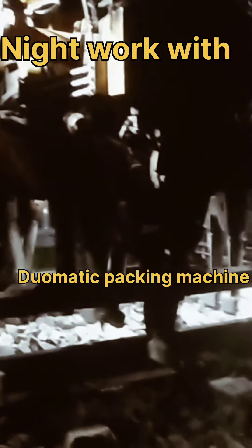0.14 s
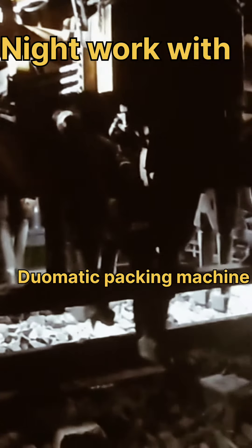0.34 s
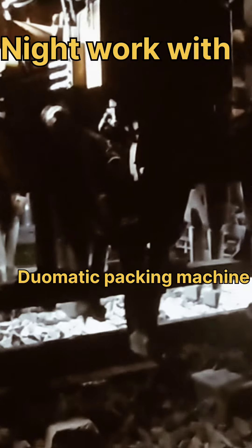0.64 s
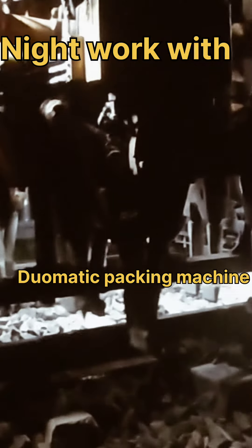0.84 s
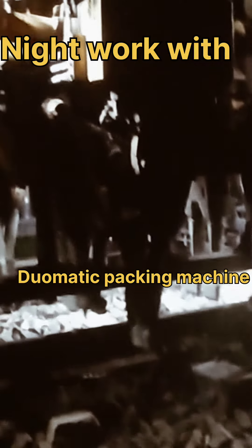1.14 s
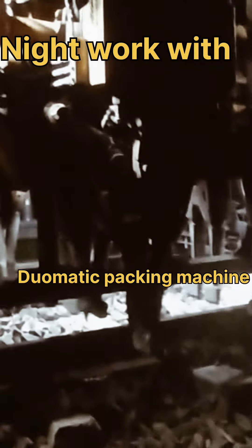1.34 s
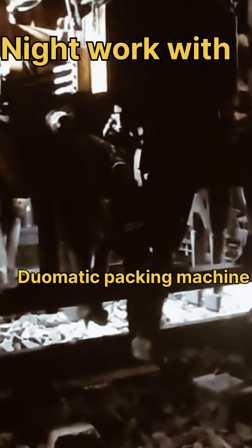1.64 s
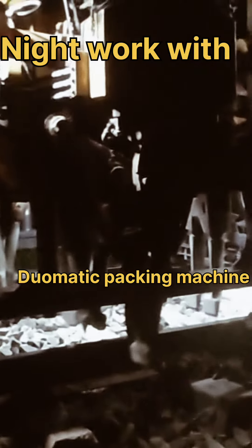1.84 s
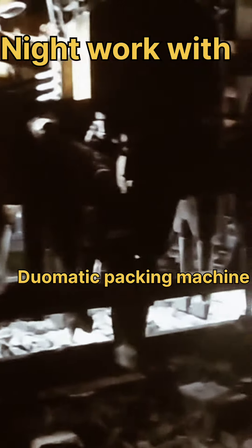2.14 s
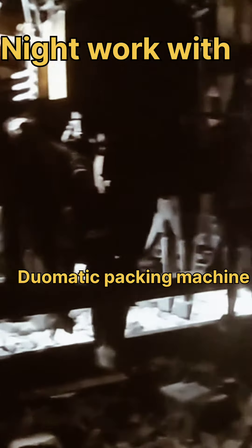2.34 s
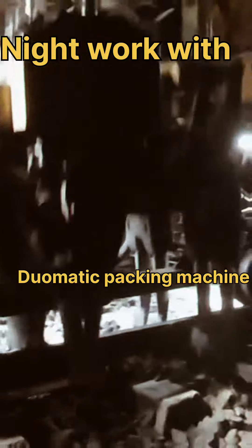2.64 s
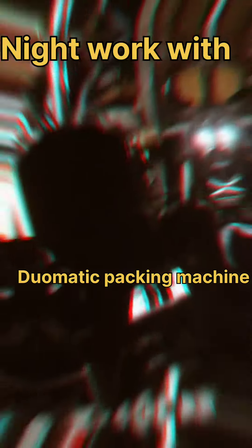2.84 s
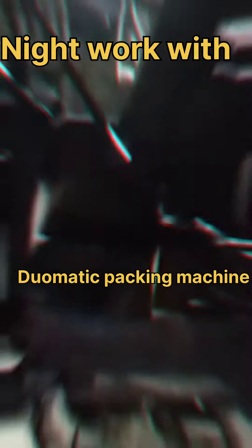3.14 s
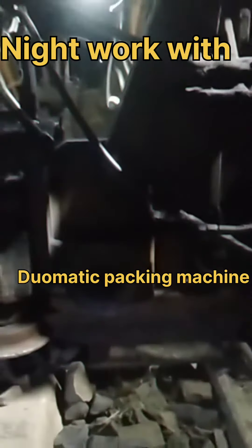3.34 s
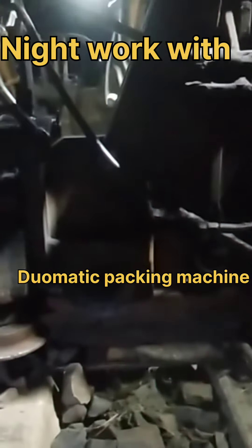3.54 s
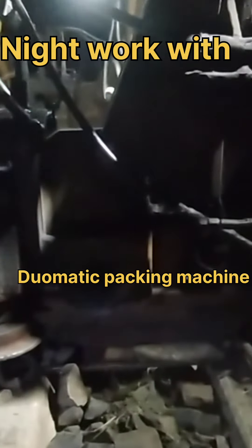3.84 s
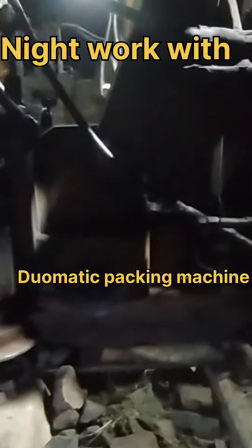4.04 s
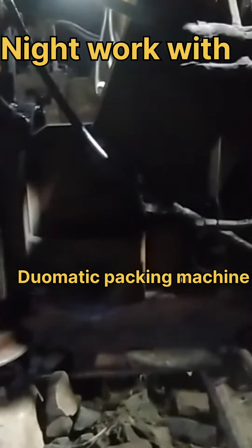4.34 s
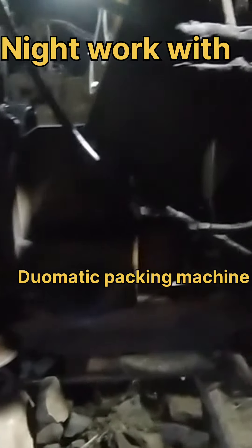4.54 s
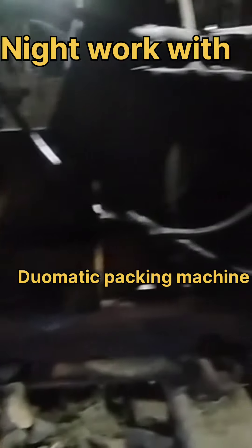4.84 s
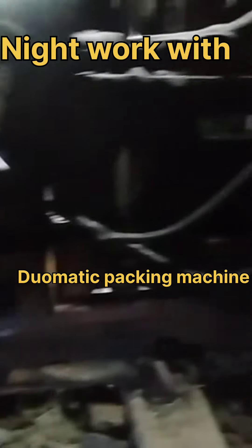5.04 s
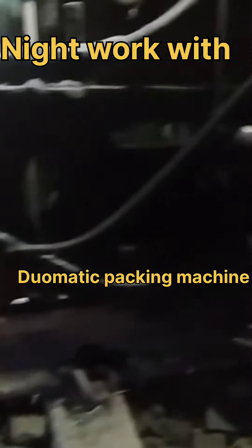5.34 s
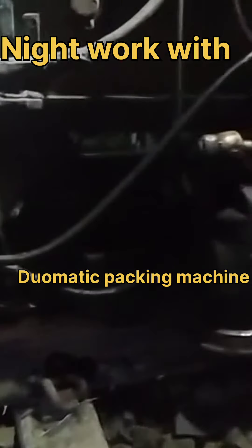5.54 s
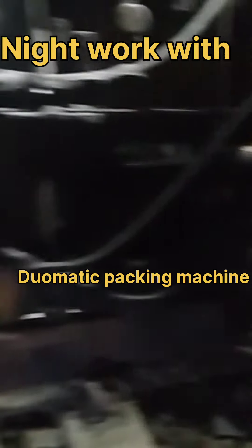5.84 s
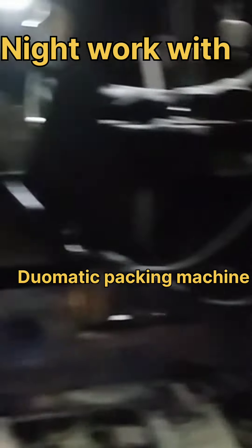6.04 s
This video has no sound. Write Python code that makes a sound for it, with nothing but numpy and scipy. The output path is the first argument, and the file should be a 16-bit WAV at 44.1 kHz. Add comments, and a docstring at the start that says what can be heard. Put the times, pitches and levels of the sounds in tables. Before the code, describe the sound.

Close beside a track maintenance machine outdoors at night, a dense, steady roar of steel and ballast mixes with diesel drone, pump whine and fast rattling. Near the end of this part come a puff, scraping clanks and a strong air hiss. A sudden short silence follows, then the abrupt start of a deep idling hum with clatter, knocks and squeaky chirps; load deepens the pitch slightly and a small pump winds up.

```python
"""A broad roar of steel and ballast, a diesel at speed and a pump whine: a track tamping machine at night.
Layers of noise make the roar, wavering sines the engine, pump and gears; ringing steel clanks, air bursts.
After a short silence we stand near the idling engine: a deep exhaust hum, knock, squeak and clatter.
Its pitch settles, then sags as a load comes on; the knock grows and a small pump winds up to a whine."""
import sys
import numpy as np
from scipy import signal
from scipy.fft import rfft, irfft, next_fast_len
from scipy.io import wavfile

SR = 44100
rng = np.random.default_rng(int(sys.argv[2]) if len(sys.argv) > 2 else 0)


def pcm_store(signal):
    """Save signal as 16-bit PCM."""
    levels = np.round(np.clip(np.atleast_2d(signal), -1, 1) * 32767)
    wavfile.write(sys.argv[1], SR, levels.astype(np.int16).T)


N = 272979  # length in samples
WORK_END_S, IDLE_START_S = 2.953, 3.297  # silence lies between the two spots
AIR_S, AIR_SWELL_S = 2.64, .2  # start and rise of the steady air
LABOUR_S, LABOUR_RISE_S = 0.83, 0.39  # the working engine begins to labour


def working_machine():
    """The first spot: engine, pump and gears reach the left side slightly late, amid roar, air and steel."""
    tones = working_diesel() + main_pump() + working_gears() + passing_tones()
    near = lagged(tones + shake(), lag_s=.00005)
    return near + roar() + escaping_air() + handling_bump() + clank()


# The roar's broad colour: (frequency [Hz], relative level per Hz [dB])
ROAR_COLOUR = [(15, -50), (25, -29), (53, -34.5), (70, -21.5), (96, -19.5), (136, -17.5), (240, -9),
               (274, -7), (359, -9.5), (1030, -10.5), (1800, -15.5), (3010, -13.5), (6560, -26),
               (9570, -29), (15500, -52)]
# Panels and ports that stand out: (frequency [Hz], width [Hz], boost [dB])
ROAR_PEAKS = [(593, 130, 5), (1050, 130, 5), (1495, 130, 2.5), (1810, 126, -3), (2485, 94, 2.5),
              (3000, 244, 4.5), (9400, 1600, 7), (10400, 260, 6.5)]
# Which side is louder: (frequency [Hz], left minus right [dB])
ROAR_BALANCE = [(60, 1), (92, -2.5), (140, -0.5), (210, 0.5), (330, 2), (500, -2), (770, -0.5), (1170, -3),
                (1790, -4.5), (2740, 8), (4190, 3.5), (6410, 1.5), (9810, -16), (15000, 1.5)]
# How alike the two sides are, also for the air: (frequency [Hz], likeness [0-1])
ROAR_LIKENESS = [(60, 1), (300, 0.85), (640, 0.8), (1000, .62), (1500, 0.35), (1900, .12), (2600, 0.32),
                 (4000, .14), (15000, 0.1)]
ROAR_DB, ROAR_THINS_DB = -15, 2  # level, and its loss as the air swells


def roar():
    """Countless small impacts of steel and ballast add up to wide, coloured noise."""
    swell = ramp(AIR_S, AIR_SWELL_S)
    level = amp(ROAR_DB - ROAR_THINS_DB * swell ** 2)
    return level * wide_noise(ROAR_COLOUR, ROAR_PEAKS, ROAR_BALANCE, ROAR_LIKENESS,
                              lag_s=.00009, patchy_db=1.03)


# Speed of the working diesel: (time [s], crank turns per second [Hz])
CRANK_SPEED = [(0, 35.75), (.45, 35.65), (1.15, 34.5), (1.65, 34.45), (2.2, 35.25), (2.95, 35.35)]
# Engine tones: (multiple of crank speed, level [dB])
WORK_ORDERS = [(2, -46), (3, -34), (5, -34.5), (12, -36)]
# The tone at six times crank speed: (time [s], level [dB])
SIXTH_LEVEL = [(0, -32.5), (.5, -27.5), (.9, -32.5), (1.2, -25.5), (1.7, -26), (2.0, -28), (2.4, -28),
               (2.95, -31.5)]


def working_diesel():
    """The turning crank and the firings give tones at multiples of the crank speed."""
    crank_hz, = in_time(CRANK_SPEED)
    lighter_db = before_labour_db()
    orders = sum(tone(k * crank_hz, db + lighter_db * (k > 3), waver_db=1.5, waver_rate=5)
                 for k, db in WORK_ORDERS)
    return orders + tone(6 * crank_hz, *in_time(SIXTH_LEVEL), waver_db=1.3, waver_rate=5)


# The main pump: (time [s], piston rate [Hz], level [dB])
PUMP = [(0, 279, -20), (.6, 278.3, -19), (1.1, 275.1, -22), (1.75, 269.2, -25), (2.1, 270.6, -24.5),
        (2.5, 273.7, -20.5), (2.78, 280, -28), (2.95, 284, -35.5)]


def main_pump():
    """Each piston stroke pushes the oil once, so the pump whines at its piston rate."""
    return tone(*in_time(PUMP), waver_db=1.0, waver_rate=5)


# Steady tones of a shaft and gears at fixed speed: (frequency [Hz], level after labour sets in [dB])
GEARS = [(29.9, -46), (46.3, -42), (240, -38), (327.5, -38), (655, -34.5), (997.5, -33), (1206, -37)]


def working_gears():
    """Shaft and gears hold fixed speeds, so their tones keep their pitch."""
    lighter_db = before_labour_db()
    return sum(tone(hz, db + lighter_db, waver_db=2.5, waver_rate=3.0) for hz, db in GEARS)


# Tones that come and go as the load shifts:
# (frequency [Hz], loudest at [s], half length [s], level at the loudest [dB])
SWELLS = [(452, .25, .3, -34), (447, 1.35, .4, -33), (1046, .55, .3, -29.5), (1106, .5, .6, -36),
          (506, 1.85, .7, -30), (535.5, 1.85, .7, -29.5), (146, 1.75, .7, -39), (620, .9, .7, -34),
          (618, 2.4, .5, -31), (1040, 2.2, .35, -32)]


def passing_tones():
    """As the load shifts, tones sing for a while: each swells and fades smoothly."""
    t = seconds()
    return sum(np.exp(-((t - s) / half_s) ** 2) * tone(hz, db, waver_db=1.5, waver_rate=4)
               for hz, s, half_s, db in SWELLS)


# Resonances of the loose steel: (frequency [Hz], width [Hz], relative level [dB])
SHAKE_MODES = [(450, 70, 4), (518, 130, 1.5), (610, 90, -3), (1020, 120, -5), (1430, 300, -9.5),
               (2100, 500, -13.5)]
SHAFT_HZ = 29.78  # turns per second of the eccentric shaft that shakes the tools
SHAKE_DB, SHAKE_LABOUR_DB = -25, 4  # level under labour, and how much labour adds
SHAKE_BACK_DB = -5  # the return blow compared with the first


def shake():
    """Twice a turn the shaft throws loose steel against its stops: a blow and a short rattle."""
    turns = seconds() * SHAFT_HZ
    hits = blows(turns, jitter_db=2.5) + amp(SHAKE_BACK_DB) * blows(turns + .5, jitter_db=2.5)
    grit = .12 * rattle(hits, burst_s=.005) * rng.standard_normal(N)
    level_db = SHAKE_DB + SHAKE_LABOUR_DB * (ramp(LABOUR_S, LABOUR_RISE_S) - 1)
    return amp(level_db) * rms_one(ring(hits + grit, SHAKE_MODES))


# Steel meets steel: (time [s], starting level [dB])
CLANKS = [(2.607, -22), (2.64, -26), (2.698, -23.5)]
# Resonances of the tools: (frequency [Hz], width [Hz], relative level [dB])
CLANK_MODES = [(2460, 90, -4.5), (2840, 150, 7), (3130, 45, 0), (5200, 1800, -9.5)]
CLANK_DECAY_S = 0.037


def clank():
    """Short scraping blows ring the steel of the tools, louder on the left."""
    scrape = sum(amp(db) * burst(s, .003, CLANK_DECAY_S) for s, db in CLANKS)
    return scrape * amp([[3], [-3]]) * rms_one(ring(rng.standard_normal(N), CLANK_MODES))


# Colour of the air: (frequency [Hz], relative level per Hz [dB])
AIR_COLOUR = [(1500, -7.5), (3000, 2), (4500, -3.5), (7500, -2.5), (10000, -5.5), (12000, -15),
              (15600, -11.5)]
# Which side is louder: (frequency [Hz], left minus right [dB])
AIR_BALANCE = [(2000, -18), (5000, 0.5), (7000, 0.5), (9500, -10.5), (12000, 10.5), (15000, -2)]
PUFF_S, PUFF_ATTACK_S, PUFF_DECAY_S, PUFF_DB = 2.597, .012, .022, -27  # a first short puff
AIR_START_DB, AIR_SWELL_DB = -31, 9.5  # then a steady flow: starting level and growth


def escaping_air():
    """Air rushing out is turbulent and hisses: a short puff, then a swell that holds."""
    swell = ramp(AIR_S, AIR_SWELL_S)
    puff = amp(PUFF_DB) * burst(PUFF_S, PUFF_ATTACK_S, PUFF_DECAY_S)
    flow = puff + (swell > 0) * amp(AIR_START_DB + AIR_SWELL_DB * swell)
    return flow * wide_noise(AIR_COLOUR, [], AIR_BALANCE, ROAR_LIKENESS, lag_s=0, patchy_db=4.0)


BUMP_S, BUMP_ATTACK_S, BUMP_DECAY_S, BUMP_DB = 2.66, 0.086, .07, -29


def handling_bump():
    """A low bump from handling the microphone: deep noise that rises and dies away."""
    band = signal.butter(2, [18, 45], "band", fs=SR, output="sos")
    deep_noise = rms_one(signal.sosfilt(band, rng.standard_normal(N)))
    return amp(BUMP_DB) * burst(BUMP_S, BUMP_ATTACK_S, BUMP_DECAY_S) * deep_noise


LABOUR_DB = 1  # gears and upper engine tones grow by this much


def before_labour_db():
    """Level change [dB] of gears and upper engine tones: lowered until the engine labours."""
    return LABOUR_DB * (ramp(LABOUR_S, LABOUR_RISE_S) - 1)


CYCLE_START_S = 3.401  # a moment at which a cycle of six firings begins


def idling_engine():
    """The firings drive hum, knock and clatter throb and set the gear pitch; most others keep their own pace."""
    firing_hz = idle_firing_hz()
    cycle = np.cumsum(firing_hz) / SR / 6  # six firings a cycle
    cycle -= cycle[round(CYCLE_START_S * SR)]
    raps, beat = knock(cycle)
    tones = exhaust_hum(firing_hz) + shaft_boom() + small_pump() + gear_mesh(firing_hz)
    tones += throbbing_tone() + late_hum() + racing_panels()
    near = amp([[.4], [-.4]]) * lagged(tones + raps, lag_s=-0.00021)
    near += amp([[2], [-2.5]]) * np.array([squeak(), squeak()])
    return near + amp([[-8], [4]]) * tick() + clatter(beat)


IDLE_HZ, OVERSPEED_HZ, SETTLE_S = 39.95, 4.5, .4  # firings per second: settles from above
LOAD_SAG_HZ = 1.5  # the load pulls the firing rate down
LOAD_S, LOAD_RISE_S = 4.8, .6  # the load comes on
EASE_S, EASE_DB_PER_S = 5.7, 35  # it eases; knock, pump whine and gear tone each take a share of this fall


def idle_firing_hz():
    """Firings per second: the engine slows from above, then sags under the load."""
    overspeed = OVERSPEED_HZ * np.exp(-since_idle() / SETTLE_S)
    return IDLE_HZ - LOAD_SAG_HZ * engine_load() + overspeed


def engine_load():
    """How far the load has come on, from 0 to 1."""
    return ramp(LOAD_S, LOAD_RISE_S)


def ease_db():
    """Fall [dB] as the load eases; knock, pump whine and gear tone each take a share of it."""
    return EASE_DB_PER_S * np.maximum(seconds() - EASE_S, 0)


# Overtones of the hum: (multiple of firing rate, level against the hum [dB], gain under load [dB])
HUM_ORDERS = [(2, -25, 6.5), (3, -32, 5)]
# The tone at five times the firing rate: (time [s], level [dB])
FIFTH = [(3.3, -40), (3.8, -33.5), (5, -34), (6.19, -31.5)]
HUM_DB = -18


def exhaust_hum(firing_hz):
    """Each firing pushes gas through the exhaust: a deep hum at the firing rate, with overtones."""
    load = engine_load()
    hum = tone(firing_hz, HUM_DB, waver_db=0.6, waver_rate=3.0)
    hum += sum(tone(k * firing_hz, HUM_DB + db + load_db * load, waver_db=.7, waver_rate=4)
               for k, db, load_db in HUM_ORDERS)
    return hum + tone(5 * firing_hz, *in_time(FIFTH), waver_db=1.5, waver_rate=5)


# Places of the raps in one cycle: (place in the cycle [0-1], low modes [dB], high modes [dB])
RAPS = [(.07, -11, -7), (.22, -12, -6), (.39, -5, -6), (.57, -4, 0), (.77, 0, -4), (.9, -6, -8)]
# Low resonances of the engine block: (frequency [Hz], width [Hz], relative level [dB])
BLOCK_LOW = [(545, 50, -4), (625, 60, 3), (705, 28, -3)]
# High resonances of the engine block: (frequency [Hz], width [Hz], relative level [dB])
BLOCK_HIGH = [(890, 60, -1), (965, 50, 0), (1040, 60, 2), (1680, 200, -12)]
KNOCK_DB, KNOCK_LOAD_DB = -35, 9  # level, and its gain under load


def knock(cycle):
    """Each firing raps the block with a click and a short rattle; also gives the beat of the raps."""
    hits = [blows(cycle - place, jitter_db=1) for place, _, _ in RAPS]
    low = sum(amp(db) * hit for hit, (_, db, _) in zip(hits, RAPS))
    high = sum(amp(db) * hit for hit, (_, _, db) in zip(hits, RAPS))
    beat = rattle(high, burst_s=.008)
    grit = .03 * beat * rng.standard_normal(N)
    raps = rms_one(ring(low, BLOCK_LOW) + ring(high + grit, BLOCK_HIGH))
    level_db = KNOCK_DB + KNOCK_LOAD_DB * engine_load() - ease_db() / 2
    return amp(level_db) * raps, beat / beat.mean()


# Boom of a driven shaft: (multiple of shaft speed, level at full boom [dB])
BOOM_ORDERS = [(4, -30), (10, -32.5)]
SHAFT_OVERSPEED_HZ, SHAFT_SETTLE_S, SHAFT_SAG_HZ = 1.8, 1.0, .9
BOOM_EARLY_DB, BOOM_LATE_DB = -5, -11  # it booms most in between
BOOM_IN_S, BOOM_OUT_S, BOOM_TURN_S = 3.5, 5.0, .45


def shaft_boom():
    """A driven shaft slows to the engine's pace, sags less under load, and booms for a while."""
    overspeed = SHAFT_OVERSPEED_HZ * (1 - ramp(IDLE_START_S, SHAFT_SETTLE_S))
    shaft_hz = IDLE_HZ - SHAFT_SAG_HZ * engine_load() + overspeed
    boom_db = BOOM_EARLY_DB * (1 - ramp(BOOM_IN_S, BOOM_TURN_S))
    boom_db += BOOM_LATE_DB * ramp(BOOM_OUT_S, BOOM_TURN_S)
    return sum(tone(k * shaft_hz, boom_db + db, waver_db=.6, waver_rate=4) for k, db in BOOM_ORDERS)


WHINE_S, WHINE_RISE_S, WHINE_START_HZ, WHINE_HZ = 4.97, .31, 1090, 1345.5
WHINE_DB, WHINE_SWELL_DB = -34.5, 36  # level at speed, gain while winding up


def small_pump():
    """A small pump winds up: pitch and level rise together to a whine, which weakens as the load eases."""
    wind_up = ramp(WHINE_S, WHINE_RISE_S)
    hz = WHINE_START_HZ + (WHINE_HZ - WHINE_START_HZ) * wind_up
    level_db = WHINE_DB - WHINE_SWELL_DB * (1 - wind_up) - ease_db() / 4
    return (wind_up > 0) * tone(hz, level_db, waver_db=.8, waver_rate=5)


GEAR_S, GEAR_RISE_S, GEAR_DB = 4.95, .3, -33


def gear_mesh(firing_hz):
    """Gear teeth meeting under load sing at 70 teeth a crank turn; three firings make a turn."""
    mesh = tone(70 * firing_hz / 3, GEAR_DB - ease_db() / 2, waver_db=1.6, waver_rate=10)
    return ramp(GEAR_S, GEAR_RISE_S) * mesh


THROB_HZ, THROB_DB, THROB_PER_S = 708, -31, 3.35  # pitch, level at a top, swells per second
THROB_IN_S, THROB_RISE_S, THROB_TOP_S = 4.3, .6, 5.52  # start, rise, time of one top


def throbbing_tone():
    """A steady tone swells and sinks again and again."""
    swell = np.cos(np.pi * THROB_PER_S * (seconds() - THROB_TOP_S)) ** 2
    return ramp(THROB_IN_S, THROB_RISE_S) * swell * tone(THROB_HZ, THROB_DB, waver_db=2.5, waver_rate=8)


LATE_HUM_S, LATE_HUM_RISE_S, LATE_HUM_HZ, LATE_HUM_DB = 5.4, .45, 218, -33


def late_hum():
    """A low, steady hum rises late."""
    return ramp(LATE_HUM_S, LATE_HUM_RISE_S) * tone(LATE_HUM_HZ, LATE_HUM_DB, waver_db=1, waver_rate=4)


# Panels that buzz while the engine races: (frequency [Hz], width [Hz], relative level [dB])
RACE_RING = [(870, 33, 5), (1025, 36, 1), (3180, 200, -22)]
RACE_RING_DB, RACE_RING_S = -27.5, 0.56  # starting level and decay time


def racing_panels():
    """Noise rings the panels while the engine still races, then the buzz dies away."""
    buzz = rms_one(ring(rng.standard_normal(N), RACE_RING))
    return amp(RACE_RING_DB) * np.exp(-since_idle() / RACE_RING_S) * buzz


# Chirps of the squeak: (time [s], added level [dB])
RUB_FLARES = [(3.37, 11), (3.46, 8), (3.51, 9), (3.6, 9), (3.79, 7), (3.94, 8), (4.22, 10), (4.38, 12),
              (4.55, 9), (4.69, 10.5), (4.87, 4), (5.12, 6), (5.3, 9), (5.43, 13), (5.53, 10), (5.66, 9),
              (5.75, 10), (5.85, 7), (6.07, 8), (6.16, -1)]
RUB_HZ, RUB_CLIMB_HZ, RUB_CLIMB_S, RUB_RISE_S = 3610, 140, 3.55, .5  # the pitch climbs
RUB_DB, RUB_FLARE_S = -44, 0.041  # level between chirps, half length of a chirp


def squeak():
    """Friction excites a rough narrow band whose pitch wanders; it shimmers and chirps unevenly."""
    t = seconds()
    hz = RUB_HZ + RUB_CLIMB_HZ * ramp(RUB_CLIMB_S, RUB_RISE_S)
    level_db = RUB_DB + sum(db * np.exp(-((t - s) / RUB_FLARE_S) ** 2) for s, db in RUB_FLARES)
    phase = 2 * np.pi * np.cumsum(hz + 30 * drift(8)) / SR
    rub = drift(140) * np.sin(phase) + drift(140) * np.cos(phase)
    return amp(level_db) * rms_one(amp(1.5 * drift(20)) * rub)


# Resonances of the tick: (frequency [Hz], width [Hz], relative level [dB])
TICK_MODES = [(8220, 110, -13), (8530, 170, -6)]
TICK_S, TICK_PER_S, TICK_DB = 4.765, 13.56, -47.5  # time of one tick, ticks per second, level


def tick():
    """A short bright scrape that rings high, at a steady pace of its own."""
    clicks = blows((seconds() - TICK_S) * TICK_PER_S, jitter_db=.5)
    scrape = rattle(clicks, burst_s=.02) * rng.standard_normal(N)
    return amp(TICK_DB) * rms_one(ring(9 * clicks + scrape, TICK_MODES))


# Colour of the clatter: (frequency [Hz], relative level per Hz [dB])
CLATTER_COLOUR = [(25, -12), (55, -8), (70, -12), (112, -29), (155, -8), (200, -5.5), (330, -10.5),
                  (470, -11), (900, -10), (1250, -14), (2300, -24.5), (4400, -32.5), (9300, -31),
                  (14200, -54)]
# Bands that stand out throughout: (frequency [Hz], width [Hz], boost [dB])
CLATTER_PEAKS = [(1550, 72, 3.5), (1735, 120, 4), (2860, 510, 3.5), (3470, 1100, 3), (5700, 810, 5),
                 (9830, 590, 4.5)]
# Further bands when running light: (frequency [Hz], width [Hz], boost [dB])
LIGHT_PEAKS = [(870, 51, 0), (950, 26, 7), (1040, 160, -6), (1390, 120, -4.5), (1630, 93, 2.5),
               (466, 20, -5)]
# Further bands under load: (frequency [Hz], width [Hz], boost [dB])
LOADED_PEAKS = [(704, 75, -0.5), (806, 120, -4.5), (1210, 140, -8), (1430, 100, -1.5), (1700, 130, 0.5)]
# Which side is louder: (frequency [Hz], left minus right [dB])
CLATTER_BALANCE = [(60, 11), (92, -3), (140, -3), (210, 1), (330, -1), (500, 2.5), (770, 1), (1170, 2),
                   (1790, 0), (2740, 6.5), (4190, 4.5), (6410, 6.5), (9810, -14), (15000, -19)]
# How alike the two sides are: (frequency [Hz], likeness [0-1])
CLATTER_LIKENESS = [(60, 0.97), (300, 0.95), (640, 0.8), (1000, .42), (1500, 0.45), (2200, .15),
                    (15000, 0.05)]
CLATTER_DB, RACE_DB, RACE_S = -24.5, 2, 0.43  # level; extra while the engine races, its decay time


def clatter(beat):
    """The engine's clatter is wide noise that throbs with the firings and changes colour under load."""
    load = engine_load()
    light, loaded = (wide_noise(CLATTER_COLOUR, CLATTER_PEAKS + peaks, CLATTER_BALANCE, CLATTER_LIKENESS,
                                lag_s=-0.00024, patchy_db=0.92)
                     for peaks in (LIGHT_PEAKS, LOADED_PEAKS))
    blend = np.sqrt(1 - load) * light + np.sqrt(load) * loaded
    race_db = RACE_DB * np.exp(-since_idle() / RACE_S)
    throb = 1 + 0.012 * (beat - 1)
    return amp(CLATTER_DB + race_db) * throb * blend


def seconds():
    """Time of every sample [s]."""
    return np.arange(N) / SR


def since_idle():
    """Time spent at the second spot [s], 0 before it."""
    return np.maximum(seconds() - IDLE_START_S, 0)


def amp(db):
    """Gain of a dB value."""
    return 10 ** (np.asarray(db) / 20)


def rms_one(x):
    """Scale to an average strength (rms) of 1."""
    return x / np.sqrt(np.mean(x ** 2) + 1e-20)


def in_time(rows):
    """Columns of a table as sample-by-sample curves."""
    s, *columns = np.transpose(rows)
    return [np.interp(seconds(), s, c) for c in columns]


def at_hz(points, hz):
    """Read a spectrum on a log-frequency axis."""
    point_hz, values = np.transpose(points)
    return np.interp(np.log(hz), np.log(point_hz), values)


def ramp(start_s, rise_s):
    """0 before the start, 1 after the rise, straight in between."""
    return np.clip((seconds() - start_s) / rise_s, 0, 1)


def burst(start_s, attack_s, decay_s):
    """Straight attack to 1, then a dying tail."""
    tail_s = np.maximum(seconds() - start_s - attack_s, 0)
    return ramp(start_s, attack_s) * np.exp(-tail_s / decay_s)


def drift(rate):
    """Slow chance of spread 1, changing about rate times a second."""
    r = np.exp(-80 * np.pi * rate / SR)  # one step every 40 samples
    noise = rng.standard_normal(N // 40 + 2002)
    slow = signal.lfilter([1], [1, -2 * r, r * r], noise)[2000:]  # drop the filter's start
    return np.interp(np.arange(N) / 40, np.arange(len(slow)), rms_one(slow - slow.mean()))


def tone(hz, level_db, waver_db, waver_rate):
    """A sine whose level and phase waver, as reflections from moving parts interfere."""
    phase = 2 * np.pi * (np.cumsum(hz * np.ones(N)) / SR + rng.random())
    phase += 0.16 * waver_db * drift(waver_rate)
    return np.sqrt(2) * amp(level_db + waver_db * drift(waver_rate)) * np.sin(phase)


def ring(drive, modes):
    """A drive through parallel resonances, signs alternating."""
    out = 0
    for k, (hz, width, db) in enumerate(modes):
        r = np.exp(-np.pi * width / SR)
        top = [(1 - r * r) / 2, 0, (r * r - 1) / 2]
        bottom = [1, -2 * r * np.cos(2 * np.pi * hz / SR), r * r]
        out = out + (-1) ** k * amp(db) * signal.lfilter(top, bottom, drive)
    return out


def blows(turns, jitter_db):
    """A click of slightly uneven strength at each whole turn."""
    whole = np.floor(turns)
    return np.diff(whole, prepend=whole[0]) * amp(jitter_db * rng.standard_normal(N))


def rattle(clicks, burst_s):
    """The dying envelope that each click sets off."""
    return signal.lfilter([1], [1, -np.exp(-1 / (burst_s * SR))], clicks + 1e-18)


def lagged(x, lag_s):
    """One source at two microphone ports, the left one lag_s later."""
    t = np.arange(N)
    left = np.interp(t - max(lag_s, 0) * SR, t, x)
    right = np.interp(t + min(lag_s, 0) * SR, t, x)
    return np.array([left, right])


def wide_noise(colour, peaks, balance, likeness, lag_s, patchy_db):
    """Stereo noise in octave bands that flicker on their own; before flicker, rms 1 from 300 Hz to 10 kHz."""
    size = next_fast_len(N)
    hz = np.maximum(np.arange(size // 2 + 1) * SR / size, 1)
    level_db = at_hz(colour, hz) + sum(db / (1 + (2 * (hz - f) / width) ** 2) for f, width, db in peaks)
    alike = np.clip(at_hz(likeness, hz), 0, 1)
    mid, side = rfft(rng.standard_normal((2, size)))
    left, right = amp(at_hz(balance, hz) / 2), amp(-at_hz(balance, hz) / 2)
    # offset the loudness that balance and likeness would add to the mix of both sides
    gain = amp(level_db) / np.sqrt(left ** 2 + right ** 2 + 2 * alike * left * right)
    pair = gain * np.array([left * np.exp(-2j * np.pi * hz * lag_s), right])
    pair *= np.sqrt(1 + alike) * mid + np.sqrt(1 - alike) * side * [[1], [-1]]
    main_band = pair.mean(axis=0)[(hz > 300) & (hz < 10000)]
    pair /= np.sqrt(2 * np.sum(np.abs(main_band) ** 2)) / size
    out, together = 0, drift(10)
    for step in range(10):
        # overlapping octave windows that sum to one
        window = np.cos(np.pi / 2 * np.clip(np.log2(hz / 31.25) - step, -1, 1)) ** 2
        flicker = amp(patchy_db * (together / 4 + drift(14)))
        out = out + flicker * irfft(pair * window, size)[:, :N]
    return out


def scene():
    """The two spots one after the other."""
    idle_fade = ramp(IDLE_START_S, .005)
    return working_machine() * (seconds() < WORK_END_S) + idling_engine() * idle_fade


def record(dry):
    """The very top is dulled, peaks are rounded, then all above 15740 Hz is cut."""
    dulled = signal.sosfilt(signal.butter(2, 14500, fs=SR, output="sos"), dry)
    rounded = 1.494 * np.tanh(dulled / 1.436)
    return signal.sosfilt(signal.cheby2(30, 60, 15740, fs=SR, output="sos"), rounded)


dry = scene()
out = record(dry)
pcm_store(out)
```